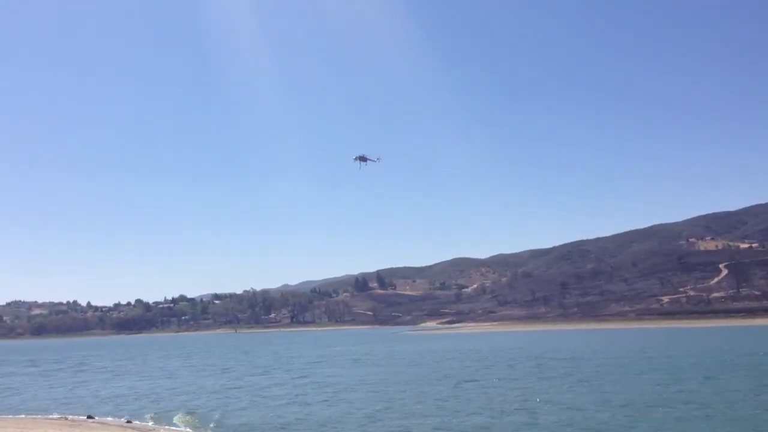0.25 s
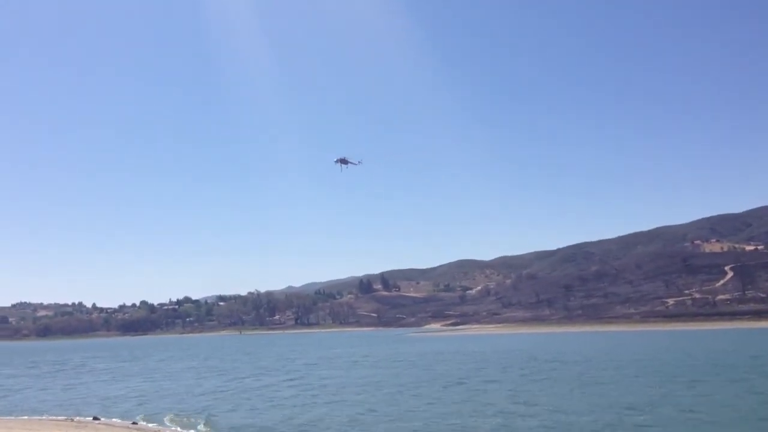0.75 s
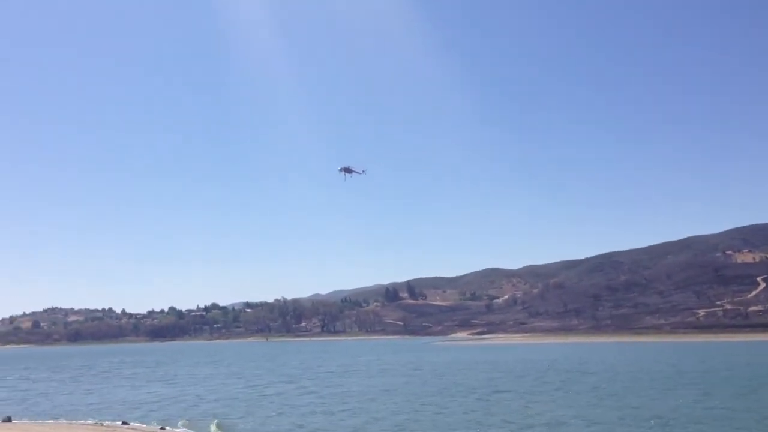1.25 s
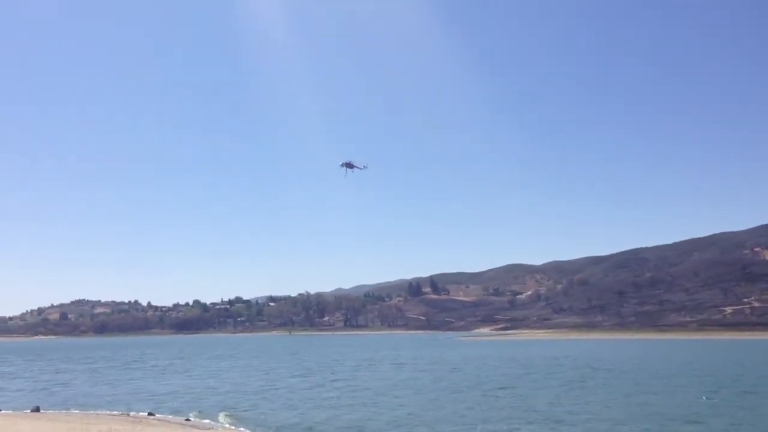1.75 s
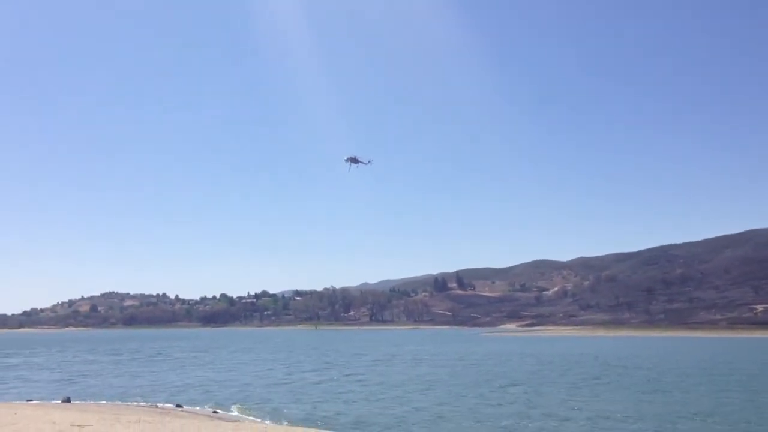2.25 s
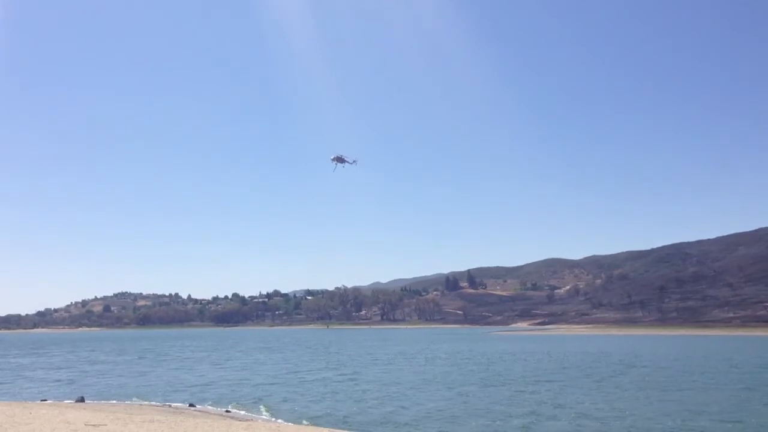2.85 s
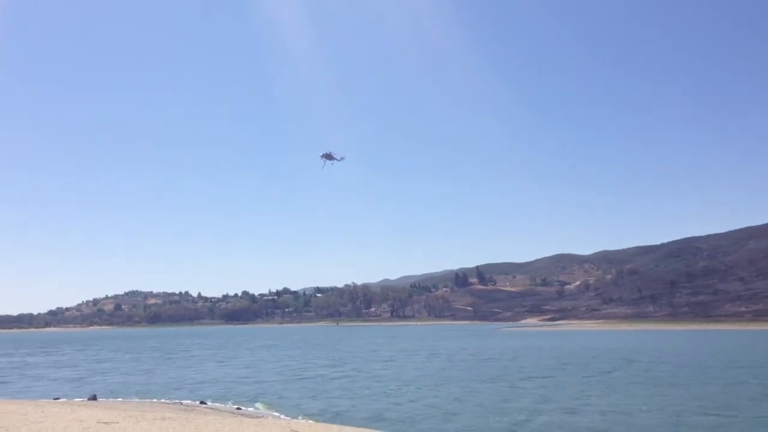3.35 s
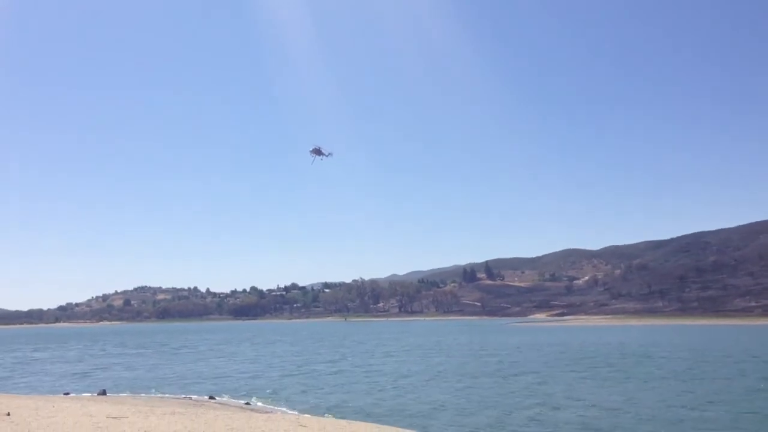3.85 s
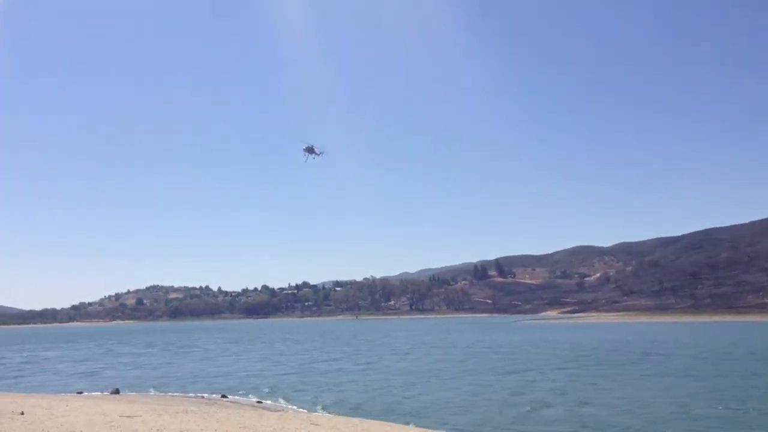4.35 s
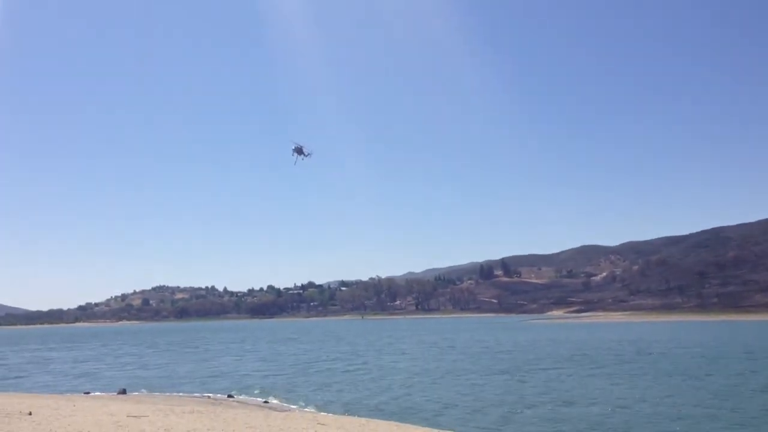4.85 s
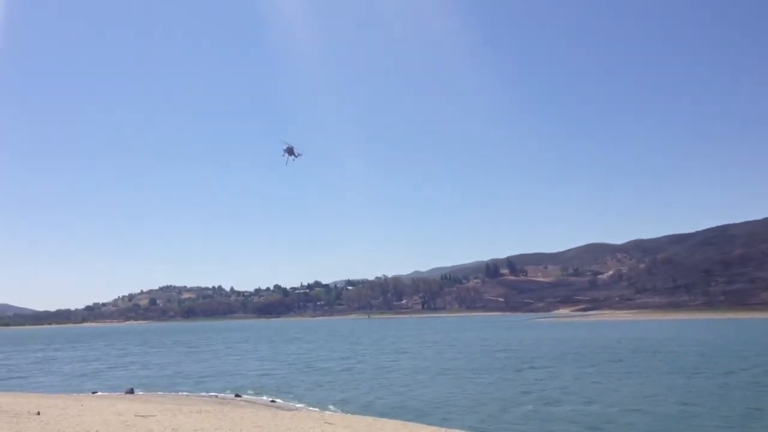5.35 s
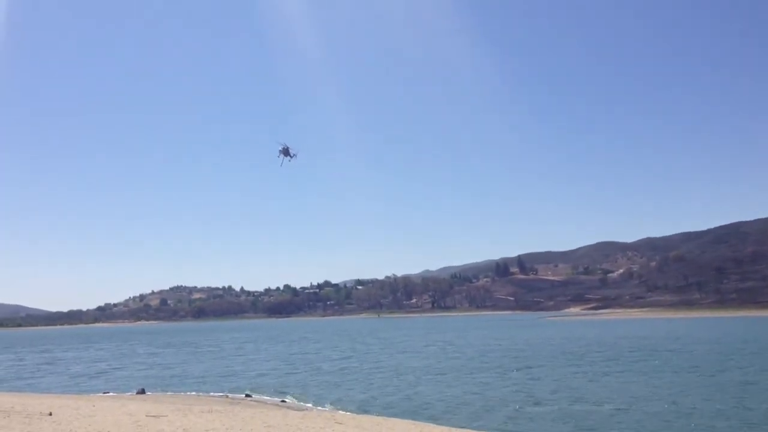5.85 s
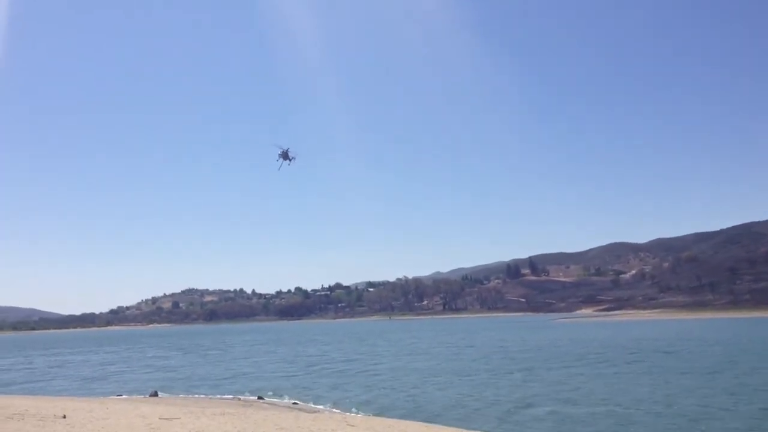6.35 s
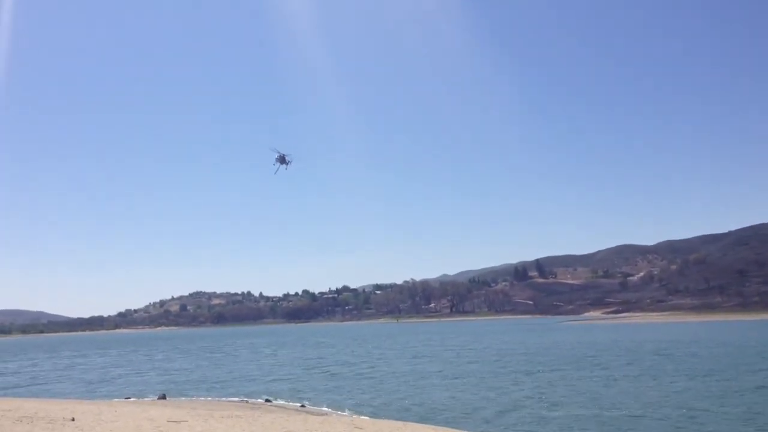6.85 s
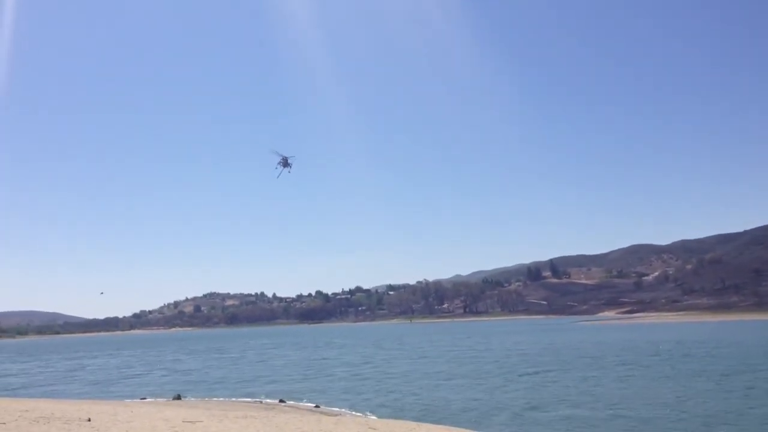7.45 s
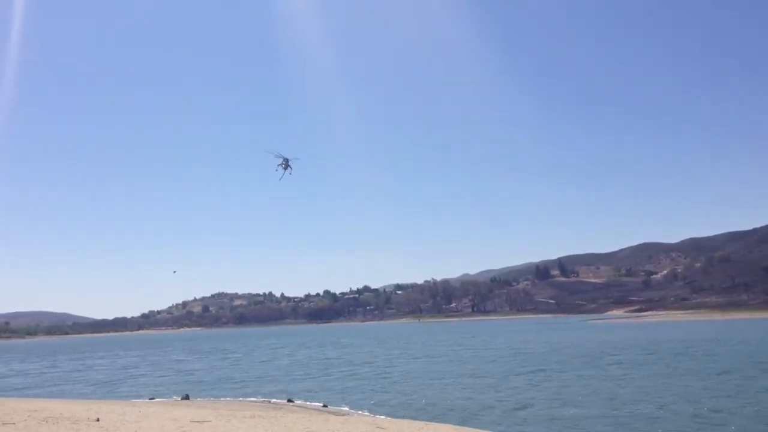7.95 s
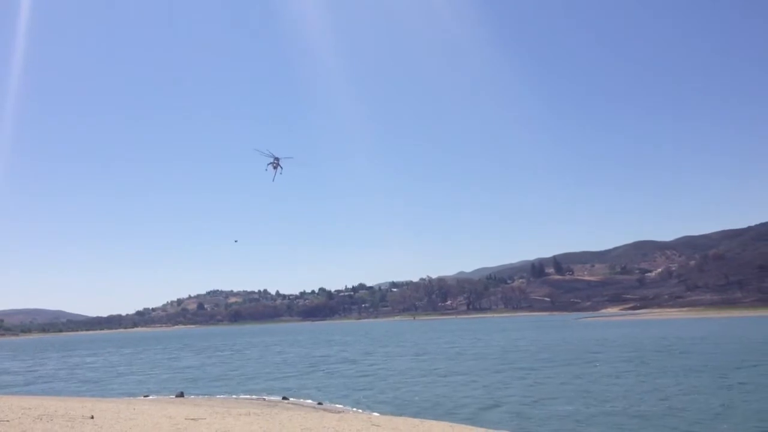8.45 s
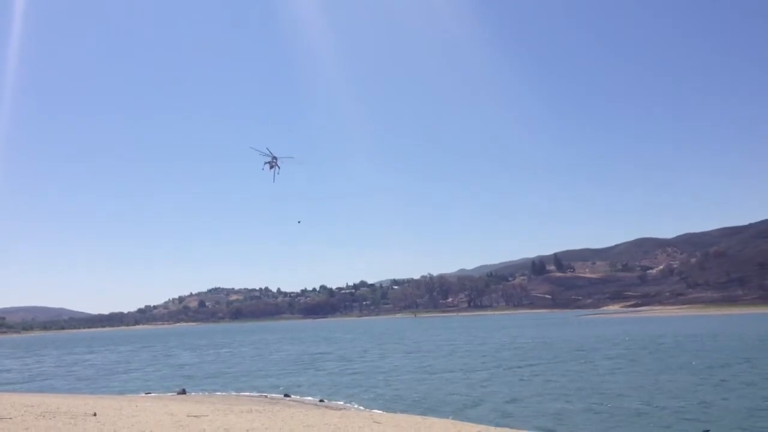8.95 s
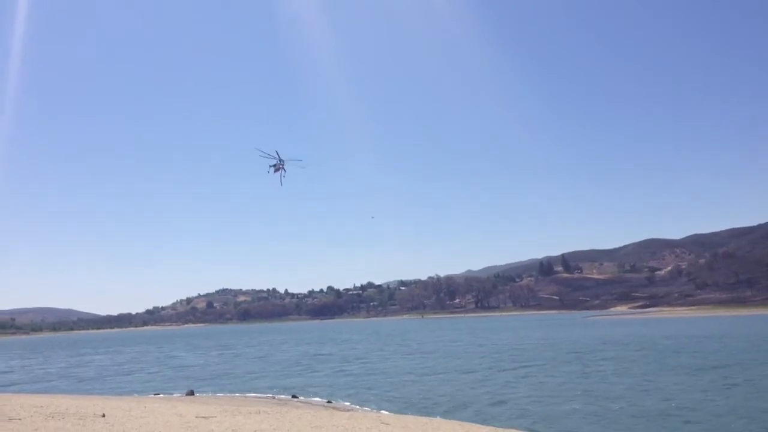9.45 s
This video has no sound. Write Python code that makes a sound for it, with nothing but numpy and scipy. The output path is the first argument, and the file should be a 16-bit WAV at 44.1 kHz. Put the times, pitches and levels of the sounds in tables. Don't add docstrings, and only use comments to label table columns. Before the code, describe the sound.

A phone on an open, windy beach picks up a turbine helicopter approaching over a lake. From 0 to 2.8 seconds, wind strikes the microphone in dense, irregular low thumps, with rumble and a few sharp pops; behind it are a soft rushing roar and a blurred, high double whine that rises slightly. At 2.8 the thumps cut off abruptly: hiss, roar and whine jump up, the whine swelling and fading in shimmering bursts and sinking a little. At 4.8 the wind slams back, hardest around 5.2 to 6. It eases around 6.3 to 6.8, leaving roar with a fast fluttering chop, then pounds again, strongly near 7.8 and 8. From about 7 the whine is cleaner, and after 7.4 the roar turns brighter and airier, with thin lower gear tones. The whine climbs towards the end at 9.7, amid gusts and a tiny scuff. No distinct slow rotor beats stand out.

```python
import sys
import numpy as np
from scipy import signal
from scipy.fft import irfft, next_fast_len
from scipy.io import wavfile
from scipy.ndimage import uniform_filter1d, map_coordinates

SR = 44100
rng = np.random.default_rng(int(sys.argv[2]) if len(sys.argv) > 2 else 0)


def store_wav(level_fs):
    pcm = np.round(np.clip(np.atleast_2d(level_fs), -1, 1) * 32767)
    wavfile.write(sys.argv[1], SR, pcm.T.astype(np.int16))


def voltage_ratio(decibels):
    exponent = np.asarray(decibels, float) / 20
    return 10 ** exponent


N = 428652
T = np.arange(0, N + 32, 32) / SR


def fine(slow):
    return np.interp(np.arange(N) / SR, T, slow)


def curves(table):
    s, *columns = np.transpose(table)
    return [np.interp(T, s, c) for c in columns]


def pockets(table):
    return sum(db * np.exp(-((T - s) / half_s) ** 2) for s, db, half_s in table)


def colour(points, hz):
    f, db = np.transpose(points)
    return np.interp(np.log(hz), np.log(f), db)


def white():
    size = next_fast_len(N + N % 2) // 2 * 2
    f = np.arange(1, size // 2 + 2) * SR / size
    return f, np.exp(2j * np.pi * rng.random(size // 2 + 1))


def noise(spectrum):
    x = irfft(spectrum)[:N]
    return x / x.std()


def walk(rate_hz):
    place = np.cumsum(rate_hz * np.ones(len(T))) * T[1]
    return map_coordinates(rng.standard_normal(5000), [place + 2], order=3)


def sheltered():
    start_s, end_s = 2.836, 4.797
    return np.clip((T - start_s) / .004, 0, 1) * np.clip((end_s - T) / .004, 0, 1)


def phone_noise():
    hiss_db, shelter_gain_db, rumble_db = -69, 9, -67.5
    port = sheltered()
    f, air = white()
    puff_db = pockets([(9.65, 13, .012)])
    hiss = noise(air * (f > 5500) * (f / 10000) ** -0.15)
    hiss = fine(voltage_ratio(hiss_db + shelter_gain_db * port + puff_db)) * hiss
    hiss += fine(voltage_ratio(hiss_db - 3.0) * port) * noise(air * np.exp(-((f - 14300) / 1300) ** 2))
    gust_db = .4 * (curves(GUST)[0] + 29)
    rumble_db = rumble_db + 3.0 * walk(6.6) + gust_db - 4.0 * port
    return hiss + fine(voltage_ratio(rumble_db)) * noise(air * f ** 1.7 * (f < 70))


# (time [s], level [dB])
GUST = [(0.0, -31), (0.3, -26), (1.2, -24.5), (1.6, -25), (1.9, -25), (2.2, -27), (2.83, -26), (4.8, -25),
        (5.15, -23.5), (5.6, -25), (6.05, -25.5), (6.3, -31), (6.8, -33), (7.0, -27), (7.6, -25.5),
        (8.5, -29), (9.1, -26), (9.72, -23.5)]
# (time [s], peak level [dB], pitch [Hz])
THUMPS = [(0.034, -17, 440), (0.085, -17, 480), (0.126, -16, 310), (0.256, -9, 420), (0.274, -11, 250),
          (0.307, -12, 320), (0.326, -10, 430), (0.341, -16, 440), (0.378, -11, 400), (0.408, -16, 260),
          (0.436, -10, 410), (0.464, -7, 390), (0.531, -13, 380), (0.545, -13, 360), (0.596, -16, 340),
          (0.611, -12, 330), (0.669, -10, 340), (0.684, -17, 330), (0.739, -15, 280), (0.755, -12, 380),
          (0.772, -7, 400), (0.799, -15, 290), (0.866, -12, 390), (0.887, -13, 330), (0.898, -14, 360),
          (0.913, -5, 370), (0.924, -14, 330), (0.987, -10, 600), (1.004, -13, 360), (1.024, -10, 320),
          (1.038, -10, 390), (1.057, -13, 420), (1.08, -5, 430), (1.1, -15, 240), (1.113, -13, 300),
          (1.18, -11, 410), (1.219, -6, 500), (1.261, -16, 310), (1.295, -10, 310), (1.311, -9, 240),
          (1.356, -11, 320), (1.372, -14, 450), (1.393, -10, 360), (1.426, -10, 380),
          (1.517, -14, 350), (1.538, -14, 380), (1.564, -14, 330), (1.584, -10, 410), (1.676, -14, 360),
            (1.763, -12, 370), (1.777, -13, 390), (1.819, -9, 350), (1.832, -13, 450), (1.868, -11, 390),
            (1.939, -16, 320), (1.961, -12, 270), (1.977, -14, 280), (2.005, -15, 490), (2.021, -13, 320),
            (2.112, -13, 470), (2.129, -15, 350), (2.163, -15, 410), (2.18, -14, 350), (2.216, -15, 450),
            (2.266, -15, 340), (2.292, -9, 490), (2.356, -10, 310), (2.518, -15, 340), (2.536, -13, 450),
            (2.59, -13, 400), (2.634, -13, 280), (2.655, -10, 390), (2.666, -17, 290), (2.692, -17, 430),
            (2.724, -16, 230), (2.754, -16, 260), (2.795, -13, 320), (4.813, -15, 220), (4.825, -6, 360),
            (4.869, -7, 320), (4.902, -8, 330), (4.925, -10, 320), (4.943, -10, 340), (4.969, -14, 400),
            (4.984, -17, 340), (5.006, -11, 490), (5.028, -10, 290), (5.047, -8, 350), (5.073, -6, 310),
            (5.097, -15, 490), (5.128, -9, 350), (5.144, -6, 410), (5.16, -3, 450), (5.2, -4, 410),
            (5.229, -6, 410),
          (5.29, -9, 420), (5.301, -10, 270), (5.322, -12, 310), (5.338, -6, 300), (5.371, -14, 480),
            (5.389, -8, 400), (5.406, -16, 480), (5.45, -5, 440), (5.479, -17, 380), (5.51, -11, 470),
            (5.534, -16, 460), (5.575, -10, 420), (5.599, -4, 600), (5.627, -13, 400), (5.658, -12, 440),
            (5.676, -16, 390), (5.688, -17, 360), (5.733, -16, 300), (5.76, -8, 290), (5.773, -16, 350),
            (5.792, -15, 330), (5.812, -14, 380), (5.841, -7, 550), (5.878, -8, 280), (5.899, -16, 310),
            (5.92, -13, 450), (5.942, -12, 450), (6.051, -6, 400), (6.063, -5, 290), (6.1, -17, 370),
            (6.112, -17, 310), (6.199, -12, 380), (6.211, -16, 350), (6.295, -17, 480), (6.373, -15, 360),
            (6.396, -14, 450), (6.814, -17, 270), (6.906, -11, 260), (6.922, -14, 350), (6.934, -17, 230),
            (6.987, -7, 290), (7.06, -7, 440), (7.094, -14, 370), (7.125, -16, 460), (7.156, -16, 330),
            (7.173, -17, 500), (7.222, -13, 450), (7.274, -16, 280), (7.299, -14, 390), (7.321, -15, 340),
            (7.38, -16, 320), (7.402, -13, 250), (7.491, -13, 370), (7.535, -14, 410), (7.571, -17, 390),
            (7.627, -10, 340),
          (7.684, -10, 390), (7.708, -4, 490), (7.726, -11, 300), (7.737, -14, 310), (7.78, -3, 360),
            (7.841, -8, 350), (7.86, -15, 310), (7.874, -14, 480), (7.898, -14, 400), (7.925, -16, 480),
            (7.943, -14, 420), (7.968, -13, 280), (7.992, -3, 430), (8.021, -10, 340), (8.113, -16, 410),
            (8.177, -12, 440), (8.19, -16, 390), (8.238, -17, 300), (8.286, -8, 330), (8.298, -11, 410),
            (8.381, -8, 540), (8.403, -15, 350), (8.532, -12, 370), (8.573, -14, 360), (8.631, -15, 370),
            (8.663, -7, 310), (8.682, -14, 290), (8.708, -16, 270), (8.799, -9, 260), (8.837, -9, 350),
            (8.852, -11, 420), (8.921, -10, 370), (8.948, -14, 270), (8.974, -13, 480), (9.038, -11, 450),
            (9.069, -13, 350), (9.091, -15, 360), (9.159, -12, 460), (9.199, -17, 450), (9.239, -12, 430),
            (9.253, -16, 330), (9.277, -12, 410), (9.3, -16, 510), (9.319, -13, 400), (9.341, -17, 430),
            (9.376, -10, 530), (9.399, -14, 280), (9.414, -16, 400), (9.466, -11, 280), (9.496, -14, 510),
            (9.516, -12, 410), (9.531, -16, 310), (9.604, -17, 290), (9.629, -15, 370), (9.641, -17, 360)]
# (time [s], peak level [dB], pitch [Hz])
CROWD = [(0.249, -13, 380), (0.474, -11, 290), (0.624, -17, 290), (1.088, -14, 360), (1.175, -17, 300),
         (1.211, -12, 490), (1.306, -8, 260), (2.303, -17, 360), (2.526, -16, 280), (2.806, -15, 340),
         (4.894, -13, 340), (4.93, -16, 400), (5.012, -14, 280), (5.053, -14, 240), (5.084, -10, 240),
         (5.221, -13, 330), (5.241, -13, 550), (5.28, -14, 360), (5.308, -17, 220), (5.503, -16, 330),
         (5.592, -13, 360), (5.752, -15, 310), (5.835, -12, 480), (7.071, -17, 270), (7.632, -14, 240),
         (7.83, -11, 520), (8.07, -17, 330), (8.09, -19, 300), (8.224, -16, 480), (8.277, -9, 200),
         (8.791, -12, 400), (8.843, -16, 220), (9.474, -16, 340)]


def thumps():
    patter_db, spread_db, patter_hz = -26.5, 3, (200, 560)
    per_s, gust_power = 18, 1.2
    gust_db = curves(GUST)[0] + 26
    count = np.cumsum(per_s * voltage_ratio(gust_power * gust_db) * (1 - sheltered())) * T[1]
    late, size, pitch = rng.random((400, 3)).T
    s = np.interp(np.arange(len(late)) + late, count, T, right=np.nan)
    db = patter_db + spread_db * (size - .5) + .6 * np.interp(s, T, gust_db)
    patter = np.c_[s, db, np.interp(pitch, (0, 1), patter_hz)]
    patter = patter[(s > .02) & (s < T[-1] - .01)]
    return THUMPS + list(patter) + CROWD


def eddy(db, hz, turn, bend, size, flick):
    cycle = np.arange(-600, 900) * hz / SR
    longer = 0.0282 * max(db + 14, 0)
    width = (0.31 + 0.15 * size + longer) * np.where(cycle < 0, .6, 1.3)
    phase = cycle + 0.56 * (bend - .5) * cycle ** 2 + turn
    shape = np.exp(-.5 * (cycle / width) ** 2) * np.cos(2 * np.pi * phase)
    front = np.exp(-.5 * ((cycle + 0.024) / 0.32) ** 2)
    return shape + 0.72 * flick * front * np.cos(2 * np.pi * (1.62 * cycle + bend))


# (frequency [Hz], level [dB per Hz])
BREEZE_COLOUR = [(30, -40), (60, -39), (120, -3.5), (170, 4.5), (280, 2.5), (500, -1.5), (750, -13),
                 (1200, -21.5), (2500, -63.5), (7000, -91.5)]
# (time [s], loss [dB])
STILL = [(0.228, -2), (0.597, -2), (0.648, -13), (0.719, -21), (1.33, -2), (1.525, -4), (1.743, -2),
         (2.237, -13), (2.498, -10), (2.622, -4), (4.84, -9), (4.945, -2), (5.614, -4.5), (5.779, -7),
         (6.08, -15), (6.46, -7), (6.636, -14), (7.001, -11), (7.281, -3), (7.425, -11), (7.794, -2),
         (7.914, -12), (8.005, -24), (8.152, -9), (8.21, -7), (8.935, -3), (9.006, -16), (9.119, -14)]


def wind():
    thump_gain_db, wake_db, lull_db, still_half_s = -0.5, -15, -3, 0.011
    out, swell = np.zeros(N), np.zeros(len(T))
    for (s, db, hz), chances in zip(thumps(), rng.random((700, 4))):
        at = int(s * SR) - 600
        out[at:at + 1500] += voltage_ratio(db + thump_gain_db) * eddy(db, hz, *chances)[:N - at]
        swell += voltage_ratio(db + wake_db) ** 2 * np.exp(-((T - s) / np.where(T < s, .006, .013)) ** 2)
    f, air = white()
    lull = voltage_ratio(curves(GUST)[0] + lull_db + 0.29 * walk(16))
    still_db = pockets([(s, db, still_half_s) for s, db in STILL])
    level = np.sqrt(lull ** 2 + swell) * voltage_ratio(still_db) * voltage_ratio(3.16 * walk(70))
    out += fine(level) * noise(air * voltage_ratio(colour(BREEZE_COLOUR, f)))
    return out * fine(1 - sheltered())


# (time [s], peak level [dB])
FLICKS = [(0.254, -22), (0.323, -34), (0.435, -14), (0.664, -21), (0.774, -8), (0.863, -18), (1.077, -26),
          (1.176, -25), (1.35, -14), (1.423, -20), (1.867, -26), (5.198, -8), (5.449, -15), (5.939, -16),
          (6.048, -17), (6.198, -20), (7.778, -14), (7.829, -12), (9.374, -13)]


def flicks():
    hz, width_cycles, gain_db = 720, 0.42, -1
    out, cycle = np.zeros(N), np.arange(-100, 300) * hz / SR
    width = width_cycles * np.where(cycle < 0, .5, 1)
    shape = np.exp(-.5 * (cycle / width) ** 2) * np.sin(2 * np.pi * cycle)
    for s, db in FLICKS:
        at = int(s * SR) - 50
        out[at:at + len(shape)] += voltage_ratio(db + gain_db) * shape
    return out


# (time [s], depth [0-1])
TAIL_CHOP = [(0, 0.1), (3, 0.09), (5, 0.12), (6.2, 0.35), (7.4, 0), (9.72, 0.32)]


def tail_chop():
    blade_hz = .01207 * curves(WHINE)[0] * (1 + 0.013 * walk(3))
    turn = 2 * np.pi * np.cumsum(fine(blade_hz)) / SR
    return 1 + fine(curves(TAIL_CHOP)[0]) * (np.cos(turn) + 0.27 * np.sin(2 * turn))


# (time [s], roar [dB], clarity above usual treble [dB], whine [dB])
AIR = [(0.0, -40.5, -7.5, -60), (0.6, -39, -4.5, -58), (1.3, -42, -5, -55.5), (2.0, -34.5, -4.5, -61),
       (2.8, -40, -4, -58), (3.02, -38, 2.5, -52.5), (3.33, -39, -4, -56), (3.75, -35, 10, -47.5),
       (4.05, -39, -2, -53.5), (4.55, -36.5, 5, -50.5), (5.0, -35.5, 3.5, -53), (5.6, -37.5, -1, -52.5),
       (6.3, -32, 2, -50.5), (6.95, -38, -3, -49), (7.7, -34.5, 4.5, -50), (8.4, -36, 5.5, -56),
       (9.0, -39.5, 0.5, -56), (9.72, -38.5, 0.5, -60)]
ROAR_HZ = (1250, 2200, 3600, 6000)
INTAKE_S = 7.38


def roar_db():
    treble_db, clarity_share = (-49.5, -58.5, -73.5), (0.93, 0.97, 0.66)
    port_db, intake_db = (3.05, 6.5, 15.8, 6.4), 13
    low, clarity, _ = curves(AIR)
    treble = [db + share * clarity for db, share in zip(treble_db, clarity_share)]
    db = np.array([low] + treble)
    db[-1] += (intake_db + 1.2 * walk(15)) * np.clip((T - INTAKE_S) / 0.22, 0, 1)
    return db + np.outer(port_db, sheltered())


# (frequency [Hz], level [dB per 1/6 octave])
OPEN = [(90, -25), (500, -15.5), (1050, -8.5), (1300, -17), (1440, -3), (1800, -13.5), (2000, -1),
        (2400, -4), (2750, -8), (3200, 3), (4300, 0.5), (5300, 3), (6000, -13.5), (7500, -16)]
# (frequency [Hz], level [dB per 1/6 octave])
SHELTERED = [(60, -30), (100, -21.5), (160, -11.5), (280, -8.5), (350, -12.5), (700, -10.5), (1300, -5.5),
             (1550, -8), (1900, 0.5), (2600, -10), (3100, -8.5), (3700, -14), (4500, 3.5), (4800, 0),
             (5500, 3.5), (7500, -22.5)]


def roar():
    fan_hz, hollow_hz, fan_octaves, fan_db = 3150, 4400, 0.15, 3
    groups = roar_db()
    port, swell, out = sheltered(), walk(4.4), 0
    drift = 1 + 0.025 * walk(1.3)
    intakes = np.clip((T - INTAKE_S) / 0.35, 0, 1)
    f, air = white()
    for hz in 70 * 2 ** (np.arange(41) / 6):
        place = np.interp(np.log(hz), np.log(ROAR_HZ), np.arange(4))
        k = min(int(place), 2)
        db = groups[k] + (place - k) * (groups[k + 1] - groups[k])
        db = db + colour(OPEN, hz * drift) * (1 - port) + colour(SHELTERED, hz) * port
        hump = np.exp(-(np.log2(hz / fan_hz) / fan_octaves) ** 2)
        hollow = np.exp(-(np.log2(hz / hollow_hz) / fan_octaves) ** 2)
        db = db + fan_db * (hump - hollow) * intakes
        db = db + 0.53 * swell + 2.32 * walk(2.476) + 1.6 * walk(12)
        band = noise(air * np.clip(1 - np.abs(6 * np.log2(f / hz)), 0, 1))
        out = out + fine(voltage_ratio(db)) * band
    return out * tail_chop()


def tone(hz, blur_hz, skirt_db):
    scatter = np.clip(blur_hz / 50, 0, 1)
    path = np.sqrt(1 - scatter) + np.sqrt(scatter / 2) * (walk(blur_hz) + 1j * walk(blur_hz))
    path = path + voltage_ratio(skirt_db) * (walk(3.0 * blur_hz + 90) + 1j * walk(1.6 * blur_hz + 90))
    turn = 2 * np.pi * np.cumsum(fine(hz)) / SR
    return np.sqrt(2) * (fine(path.real) * np.cos(turn) - fine(path.imag) * np.sin(turn))


# (time [s], blur [Hz])
BLUR = [(0, 110), (3, 65), (4.5, 38), (5.3, 34), (6.4, 30), (7, 9), (8.5, 11), (9.72, 18)]
# (share of compressor speed [1], start [s], end [s], level [dB])
GEARS_1 = [(.5845, 7.5, 8.75, -49.5), (.5845, 8.7, 9.1, -53), (.5845, 9.1, 10, -55), (.5845, 6.2, 7.0, -63),
           (.6675, 7.7, 8.75, -52), (.6675, 8.7, 9.1, -52), (.6675, 9.0, 10, -56), (.408, .45, .95, -53),
           (.309, 1.9, 2.5, -52), (.6675, 4.8, 6.6, -59), (.408, 4.7, 5.5, -52), (.289, 5.8, 6.8, -47.5),
           (.309, 8.1, 8.9, -52)]
# (share of compressor speed [1], start [s], end [s], level [dB])
GEARS_2 = [
    (.5845, 8.4, 8.9, -58),
    (.6675, 8.95, 9.45, -57),
    (.5845, 4.8, 5.4, -58),
    (.289, 1.75, 2.5, -50),
    (.289, 2.84, 3.1, -43),
    (.289, 3.22, 3.55, -43),
]


def gears():
    first_hz, second_hz = curves(WHINE)
    blur_hz, = curves(BLUR)
    clear_db = 0.98 * np.clip(curves(AIR)[1], 0, 7)
    out = np.zeros(N)
    for speed_hz, table in ((first_hz, GEARS_1), (second_hz, GEARS_2)):
        for share, start, end, db in table:
            facing = np.clip(np.minimum(T - start, end - T) / 0.079, 0, 1)
            level = voltage_ratio(db + clear_db * (start > 7.5)) * facing
            out += fine(level) * tone(share * speed_hz, share * blur_hz + 5, skirt_db=-14)
    return out


# (time [s], lift [dB], half length [s])
FOCUS = [(2.87, 7.5, 0.08), (3.213, 7.5, 0.033), (3.508, 7, 0.028), (3.726, 12, 0.052), (3.856, 9, 0.026),
         (4.5, 6, 0.06), (4.63, 4, 0.048), (4.78, 7.5, 0.03), (5.385, 20.5, 0.037), (5.532, 14.5, 0.037),
         (5.694, 11, 0.073), (6.18, 6, 0.037), (6.404, 13.5, 0.024), (6.502, 9.5, 0.023), (6.72, 5.5, .07),
         (6.95, 3, 0.047), (7.28, 6.5, 0.23), (8.3, 5.5, 0.15)]
# (time [s], level [dB], half length [s])
FADES = [
    (3.07, -9, .03),
    (3.36, -4, 0.045),
    (4.92, 6, 0.026),
    (7.05, -9.5, 0.03),
]


def whine_db():
    second_db, flutter_db, port_db = 1.5, 2.5, (14, 11)
    hidden_s, hidden_db = (5.3, 7.55), -5
    path, port = curves(AIR)[2] + pockets(FADES), sheltered()
    first = path + port_db[0] * port + pockets(FOCUS) + flutter_db * walk(9)
    shade = hidden_db * np.clip(np.minimum(T - hidden_s[0], hidden_s[1] - T) / 0.15, 0, 1)
    return first, path + second_db + shade + port_db[1] * port + flutter_db * walk(10.0)


# (time [s], first compressor [Hz], second compressor [Hz])
WHINE = [(0.0, 4842.0, 4802.0), (1.0, 5014.0, 4954.0), (1.5, 5097.0, 4989.0), (2.0, 5173.0, 5003.0),
         (2.5, 5188.0, 5000.0), (3.0, 5173.0, 5005.0), (3.5, 5128.0, 4979.0), (4.5, 5013.0, 4907.0),
         (5.0, 4992.0, 4886.0), (5.5, 5000.0, 4889.0), (6.5, 5041.0, 4920.0), (7.0, 5077.0, 4943.0),
         (7.5, 5096.0, 4954.0), (8.0, 5103.0, 4988.0), (8.5, 5126.0, 5030.0), (9.0, 5198.0, 5084.0),
         (9.72, 5287.0, 5208.0)]


def compressors():
    first_hz, second_hz = curves(WHINE)
    blur_hz, = curves(BLUR)
    first_db, second_db = whine_db()
    focused_hz = blur_hz * voltage_ratio(-0.7 * pockets(FOCUS))
    second_blur_hz = blur_hz + np.interp(T, (7.3, 8), (40, 10))
    first = fine(voltage_ratio(first_db)) * tone(first_hz, focused_hz, skirt_db=-11)
    return first + fine(voltage_ratio(second_db)) * tone(second_hz, second_blur_hz, skirt_db=-11.5)


def scene():
    helicopter = compressors() + gears() + roar()
    return (helicopter + wind() + flicks())[None]


# (time [s], rise of limit [dB], half length [s])
STARVED = [(.05, 14, .06), (.3, 14, .055), (.57, 14, .13), (.85, 12, .035), (1.03, 12, .035),
           (1.25, 14, .16), (1.78, 9, .03), (1.91, 13, .05), (2.32, 8, .03), (2.76, 10, .06), (3.2, 7, .06),
           (3.35, -18, .04), (4.2, 10, .6), (3.58, 12, .04), (4.78, 12, .04), (5.2, 5, .3), (6.2, 6, .8),
           (7.05, -10, .025), (7.45, 14, .14), (7.82, 13, .03), (8.28, 9, .05), (8.47, 12, .04),
           (8.76, 8, .12), (9.0, 9, .06), (9.13, 8, .04), (9.47, 12, .09)]


def mask(x):
    mask_db, slope_db_per_octave, coarse_db = -18.5, -41, -12
    window = np.sin(np.pi * (np.arange(2048) + .5) / 2048)
    f, s, z = signal.stft(x, SR, window, 2048)
    power = np.abs(z) ** 2
    whine = power[(f > 4750) & (f < 5350)].sum(axis=0)
    whine = uniform_filter1d(whine, size=3)
    edge_hz = np.interp(s, T, curves(WHINE)[0]) + 150
    mood_db = np.interp(s, T, 1.7 * walk(14) + pockets(STARVED))
    for low in np.arange(5000, 12000, 345):
        band = (f >= low) & (f < low + 345)
        above = band[:, None] & (f[:, None] > edge_hz)
        heard = (power * above).sum(axis=0) * band.sum() / np.maximum(above.sum(axis=0), 1)
        chance_db = mood_db + 2.5 * rng.standard_normal(len(s))
        hidden_db = mask_db + slope_db_per_octave * np.log2((low + 170) / 5200)
        hidden = whine * voltage_ratio(hidden_db + chance_db) ** 2
        coarse = heard * voltage_ratio(coarse_db + chance_db) ** 2 * (low < 7700)
        z = np.where(above & (power < (hidden + coarse) / band.sum()), 0, z)
    return signal.istft(z, SR, window, 2048)[1][:N]


def top_cut(x):
    return signal.sosfilt(signal.butter(12, 15330, fs=SR, output="sos"), x)


def record(dry):
    rounded = .64 * np.tanh(dry[0] / .64)
    bass_cut = signal.butter(4, 105, "high", fs=SR, output="sos")
    heard = mask(signal.sosfilt(bass_cut, rounded) + phone_noise())
    return top_cut(heard[None])


dry = scene()
out = record(dry)
store_wav(out)
```